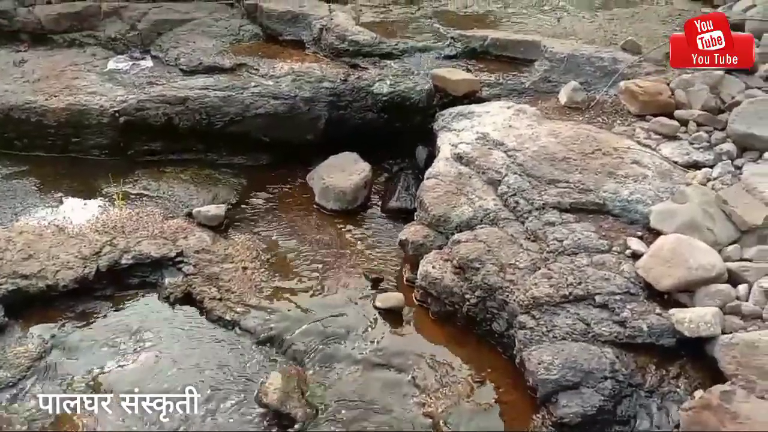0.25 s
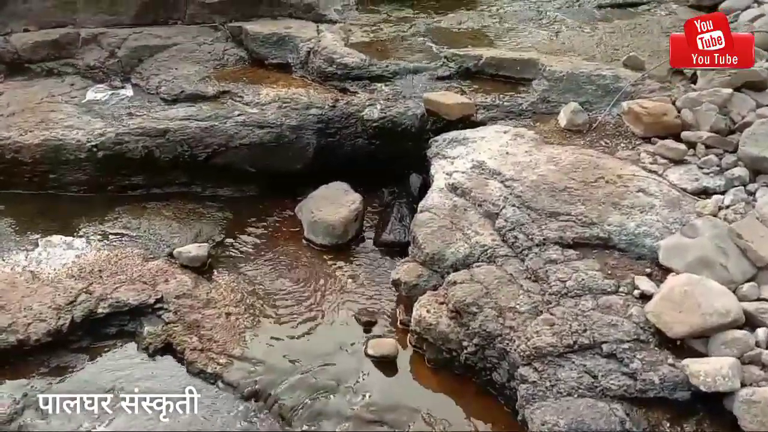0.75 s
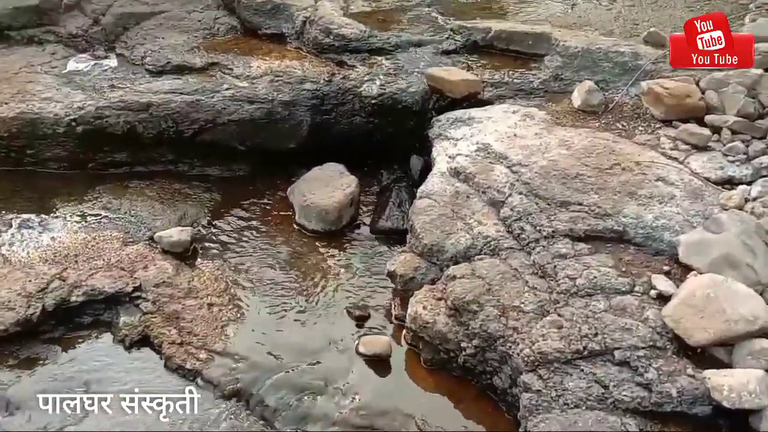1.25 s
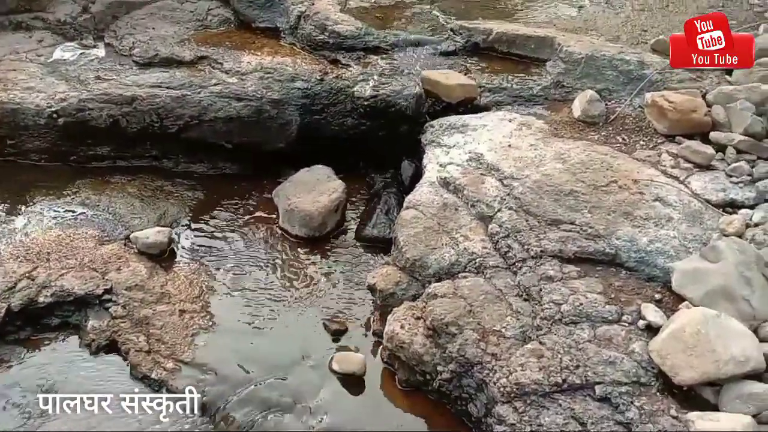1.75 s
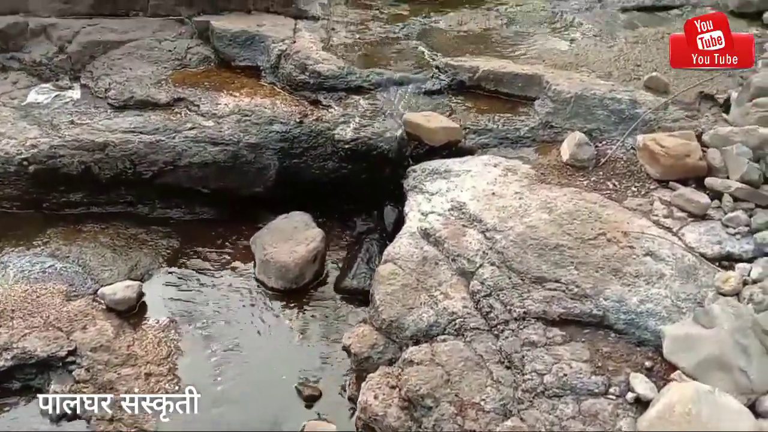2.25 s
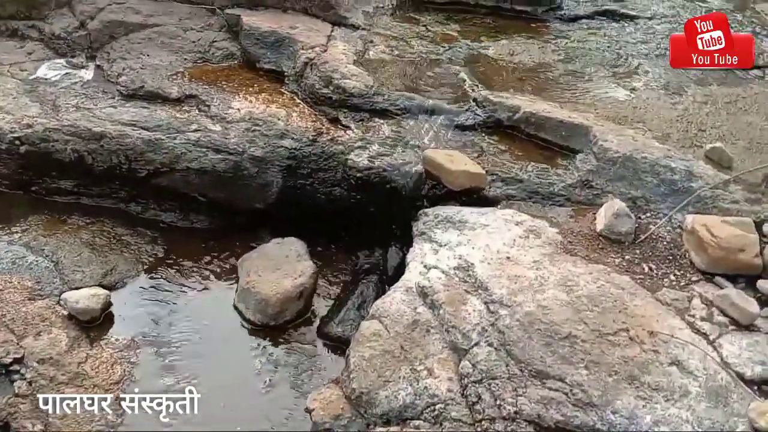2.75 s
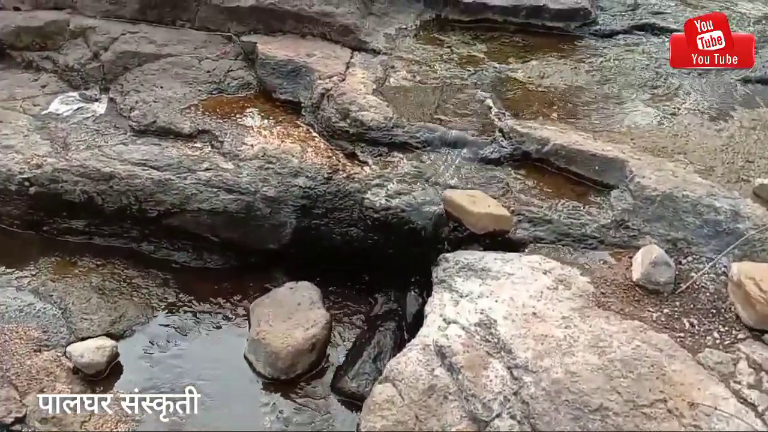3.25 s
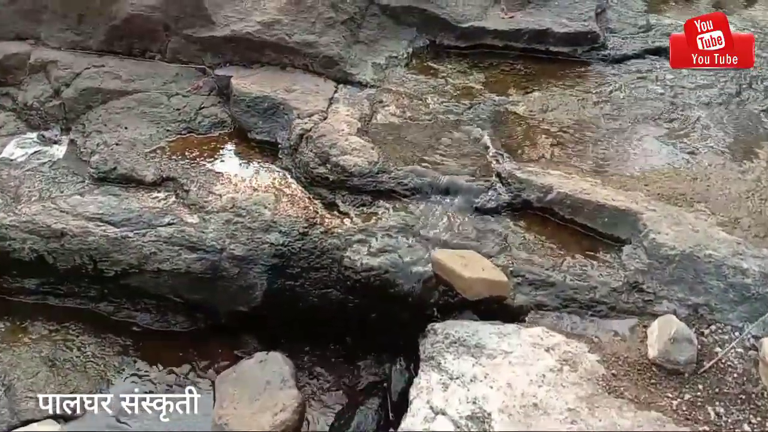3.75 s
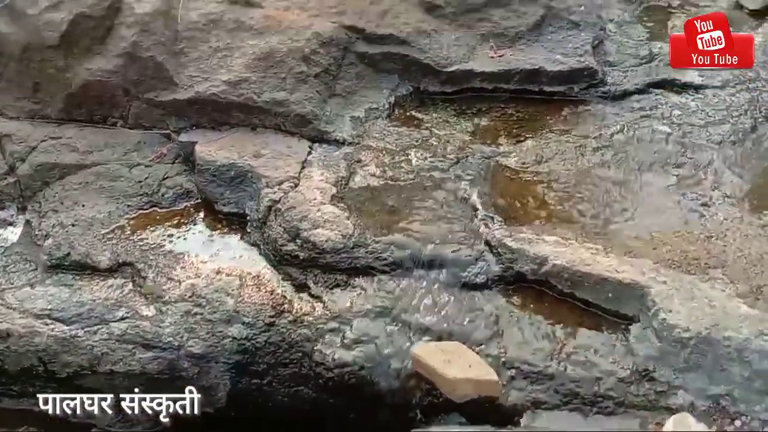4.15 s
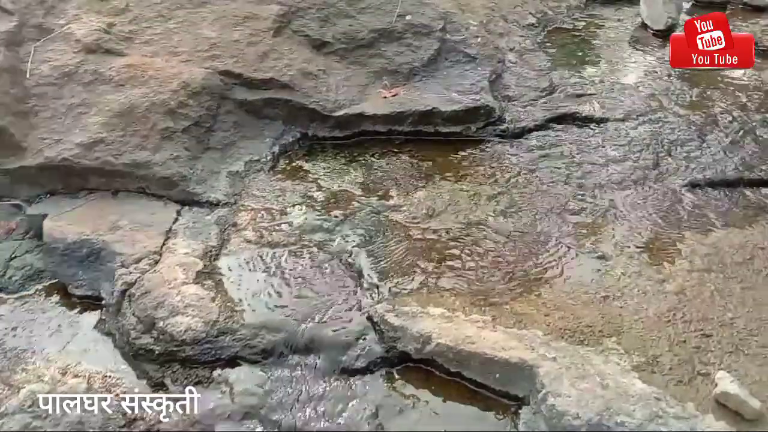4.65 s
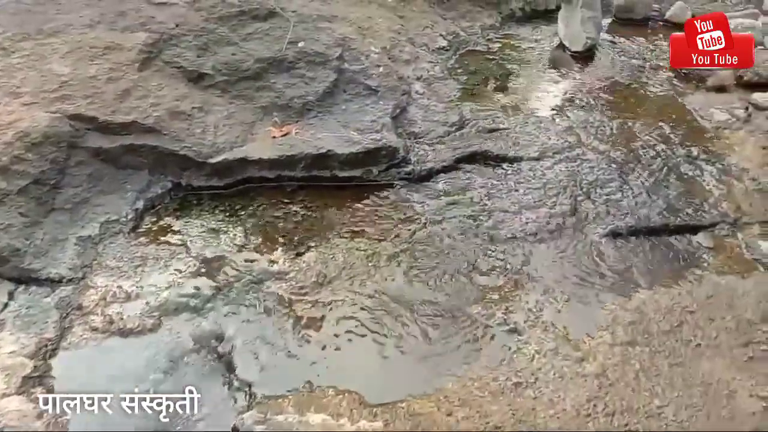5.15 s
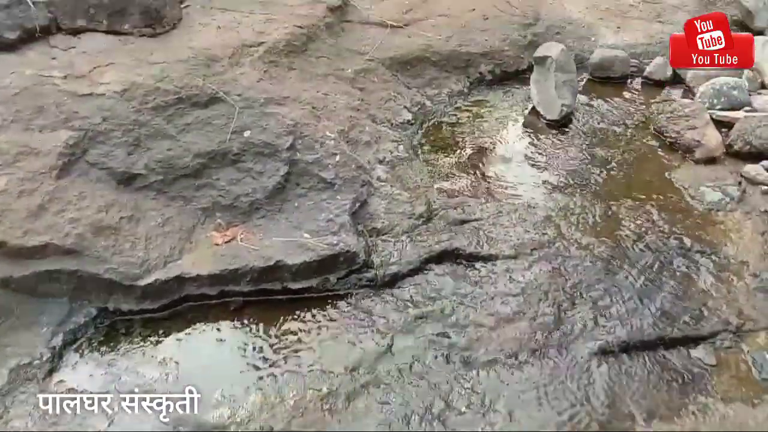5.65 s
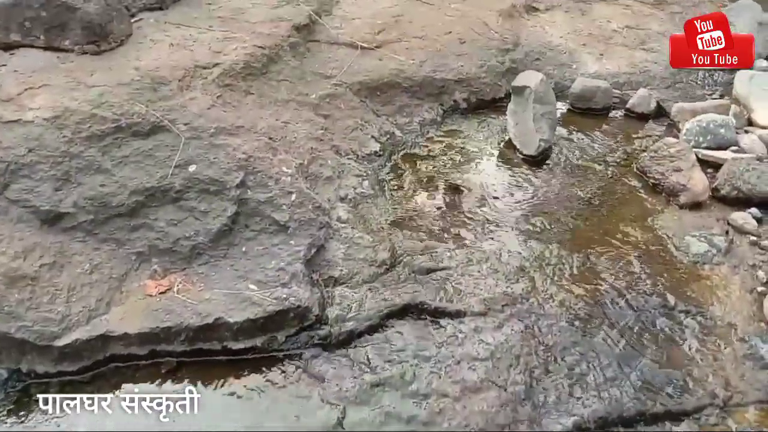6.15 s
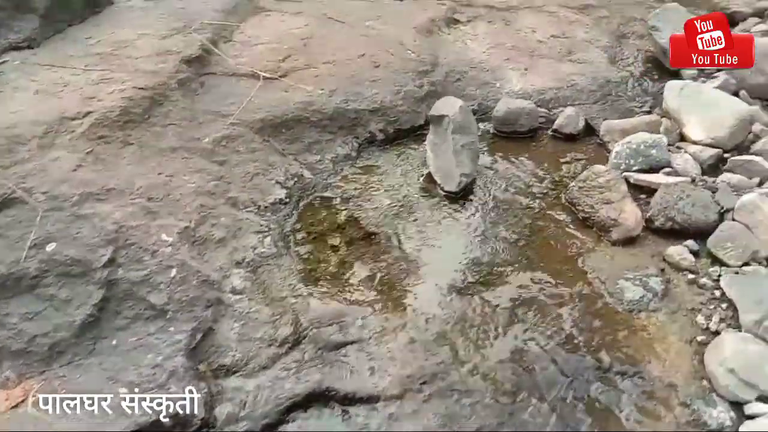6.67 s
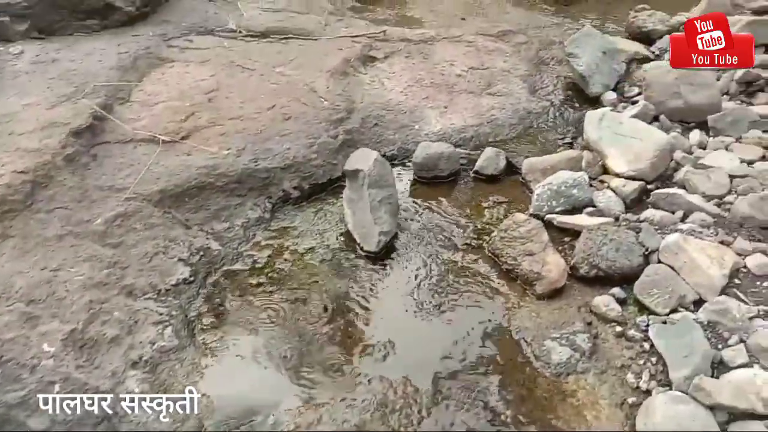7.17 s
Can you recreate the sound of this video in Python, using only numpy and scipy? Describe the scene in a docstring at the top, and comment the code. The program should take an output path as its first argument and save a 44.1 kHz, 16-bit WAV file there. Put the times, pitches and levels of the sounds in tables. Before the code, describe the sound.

A shallow stream trickles and gurgles close by over stones, bright ticks and round plops thinning to faint, sparse drips by the end.

```python
"""A shallow stream trickles between rocks close to the microphone, thinning to faint drips as the level drops.
Air pockets ring as gliding tones: big ones gurgle, small ones tick, and lesser ones cluster around each loud one.
Eddies shed runs of bubbles, a thread of water pours, foam fizzes and wavelets throw spray; the stones scatter
most of these as short echoes. Dull thuds, a distant wash, an electric buzz, a low rumble and a hiss lie underneath."""
import sys
import numpy as np
from scipy import signal
from scipy.fft import rfft, irfft
from scipy.io import wavfile
from scipy.ndimage import uniform_filter1d, map_coordinates

SR = 44100
rng = np.random.default_rng(int(sys.argv[2]) if len(sys.argv) > 2 else 0)


def generate_wav(signal):
    """Clip the signal to [-1, 1] and save it as 16-bit WAV at the path in sys.argv[1]."""
    frames = np.transpose(np.atleast_2d(signal))
    scaled = np.clip(frames, -1, 1) * 32767
    pcm = np.round(scaled).astype(np.int16)
    wavfile.write(sys.argv[1], SR, pcm)


N = 326781
TIME = np.arange(N) / SR  # seconds

# All levels in the tables are in dB before each layer's own trim, filters and echoes.
# Far wash of the stream, which also steers the buzz. Each row: time in seconds, level in dB.
WASH_LEVEL = [(0, -74.5), (1.7, -75), (2.6, -73.5), (3.0, -74), (4.2, -76.5), (5.0, -75.5), (5.5, -76),
              (5.9, -89), (7.41, -87.5)]
# Tone of the far wash. Each row: frequency in Hz, gain in dB.
WASH_COLOUR = [(60, -19.5), (140, 2), (300, 9), (600, 7.5), (1300, -14), (1850, -15), (2500, -11),
               (4600, -11), (6000, -7), (7300, -9), (8300, 13), (9200, -20), (10200, -24.5), (13000, -33)]
# Tone of the electric buzz. Each row: frequency in Hz, gain in dB.
BUZZ_COLOUR = [(60, -16), (120, 2), (240, 1), (300, -2.5), (360, -4), (450, -3), (1000, -43), (7000, -50),
               (10500, -24.5), (13000, -38.5), (15200, -25)]
# Soft bumps of low rumble. Each row: crest in seconds, level in dB.
RUMBLE_BUMPS = [(.08, -68), (.32, -69), (.52, -67), (.72, -68), (.92, -69), (1.35, -74), (1.7, -67.5),
                (1.87, -72), (2.1, -70), (2.3, -73), (2.5, -71), (2.72, -73), (2.92, -74), (3.22, -68),
                (3.45, -74), (3.65, -75), (3.92, -75), (4.1, -65), (4.3, -68), (4.48, -74), (4.73, -74),
                (5.03, -79), (5.22, -77), (5.45, -71), (5.75, -72), (6.8, -87), (7.13, -85), (7.32, -80)]
# Tone of the rumble. Each row: frequency in Hz, gain in dB.
RUMBLE_COLOUR = [(20, -27), (40, -13.5), (60, 5), (90, -2), (130, 1.5), (220, -33.5), (500, -35.5)]
# Tone of the thin hiss. Each row: frequency in Hz, gain in dB.
HISS_COLOUR = [(30, -11.5), (100, 14), (1000, -0.5), (1900, -8), (2500, 13), (3000, 5), (5500, -10),
               (7300, -16), (7750, -5), (8250, 15), (8800, 0), (9600, -12.5), (10500, -6), (13000, -14),
               (15300, -4.5)]
# Dull thuds. Each row: crest in seconds, level in dB, length in seconds.
THUDS = [(2.37, -55, 0.019), (3.213, -47.5, 0.022), (3.467, -50.5, 0.021), (3.64, -64, 0.025),
         (4.09, -67, 0.065), (4.26, -65, 0.047), (4.74, -65, 0.04), (5.46, -78, 0.093), (7.1, -71, 0.038)]
# Tone of the thuds. Each row: frequency in Hz, gain in dB.
THUD_COLOUR = [(30, -20), (90, -6), (220, 7.5), (400, -2.5), (600, -14.5), (1200, 0.5), (2000, -15),
               (4000, -31), (12000, -90)]
# Foam along the edge of the rock. Each row: time in seconds, level in dB.
FOAM_LEVEL = [(0, -61.5), (2.3, -63.5), (2.9, -66.5), (3.4, -65.5), (4.7, -67), (5.4, -71), (6.0, -86),
              (7.41, -86)]
# Thread of water pouring over the ledge. Each row: time in seconds, level in dB.
THREAD_LEVEL = [(0, -53.5), (.9, -58.5), (1.1, -51.5), (1.5, -51), (2.3, -57), (2.7, -61), (2.95, -53),
                (3.2, -59), (3.7, -56), (4.2, -56), (4.6, -64), (5.3, -68), (5.8, -96), (7.41, -96)]
# Pocket the thread falls into. Each row: frequency in Hz, width in Hz before widening, mean level in dB.
POCKET_TONES = [(2127, 100, 7), (3210, 180, -10.5), (3775, 220, 8), (4590, 280, 16), (5330, 400, 0.5),
                (5700, 210, -7)]
# Tone of the snapping films. Each row: frequency in Hz, gain in dB.
FILM_COLOUR = [(400, -2.5), (1200, -13), (1850, -3.5), (2300, -20.5), (4500, -1.5), (6000, -5.5),
               (7350, -2), (8300, 1.5), (9200, -8.5), (10000, -18), (10700, -19), (12500, -26),
               (15000, -26)]
# Steady flow between loud bubbles. Each row: time in seconds, big-bubble level in dB, small-bubble level in dB.
FLOW = [(0, -59, -51), (.3, -61.5, -47.5), (.9, -61.5, -47.5), (1.35, -54.5, -54), (1.6, -60, -45.5),
        (2.2, -53, -48.5), (2.65, -59, -49), (2.9, -58.5, -54.5), (3.15, -53, -51), (3.6, -60, -55.5),
        (4.15, -57.5, -52), (4.7, -62, -56.5), (5.1, -75.5, -57), (5.4, -61, -58), (5.7, -69.5, -62),
        (6.0, -74, -71.5), (6.4, -71.5, -68), (7.41, -81, -69)]
# Lulls as the water draws back between two wavelets. Each row: middle in seconds, change of level in dB.
LULLS = [(.29, -2.5), (1.09, -3), (1.32, -4), (1.819, -3), (2.99, -8), (3.51, -3), (3.682, -3.5),
         (3.95, -3.5), (4.343, -9), (4.91, -0.5), (5.54, -3), (6.08, -1.5), (6.98, -2.5)]
# Tone of the middle-sized bubbles. Each row: frequency in Hz, gain in dB.
BABBLE_COLOUR = [(1300, -1), (1600, -3.5), (1850, -7), (2150, 0), (2600, 2), (2900, -2.5), (3500, 4.5)]
# Hollows between stones that ring with small bubbles and spray. Each row: frequency in Hz, width in Hz, gain in dB.
HOLLOWS = [(2194, 77, -1), (2530, 220, -2.5), (3270, 71, -13.5), (3774, 280, -1.5), (4655, 150, 1.5),
           (4786, 120, -1), (5300, 220, -2.5), (5710, 130, 6.5), (7750, 3000, 10), (10300, 240, 6.5)]
# Tone of the small bubbles. Each row: frequency in Hz, gain in dB.
FIZZ_COLOUR = [(1200, 3.5), (1850, -20), (2150, -5), (2800, -2), (3600, 5), (4600, 4.5), (5100, -2.5),
               (5750, -3.5), (6300, -6.5), (7350, -1), (8300, -5.5), (9200, -3), (10200, -16), (12500, -33)]
# Wider gaps under the ledge that ring with big bubbles. Each row: frequency in Hz, width in Hz, gain in dB.
GAPS = [(538, 240, -3), (730, 160, -9.5), (985, 176, 3), (1368, 34, 5.5), (1730, 140, -11)]
# Tone of the big bubbles. Each row: frequency in Hz, gain in dB.
GURGLE_COLOUR = [(200, -49), (400, -4.5), (600, 0), (850, -2), (1200, 3.5), (1500, 1.5), (1850, -3.5),
                 (2400, -43.5)]
# Wavelets breaking on a stone. Each row: crest in seconds, spray level in dB, length in seconds, droplet pitch in Hz.
SPLASHES = [(0.19, -39, 0.012, 4470), (0.452, -49, 0.0033, 5950), (1.24, -48, 0.0087, 2560),
            (1.346, -43.5, 0.0097, 4900), (1.398, -40, 0.0086, 5300), (1.492, -36, 0.0088, 3860),
            (1.663, -46.5, 0.012, 5200), (1.853, -49, 0.049, 4020), (1.967, -50, 0.022, 4480),
            (2.113, -40.5, 0.024, 4670), (2.427, -45, 0.04, 3920), (2.758, -42.5, 0.032, 4230),
            (3.048, -43, 0.013, 3740), (3.158, -45.5, 0.023, 3820), (3.47, -37, 0.039, 4360),
            (3.789, -43, .012, 2760), (3.89, -53, 0.0097, 4500), (4.014, -54, .003, 4430),
            (4.094, -46.5, 0.059, 4660), (4.451, -54, .01, 3200), (4.668, -53, 0.022, 4400),
            (5.395, -51.5, 0.027, 3800), (5.772, -63, 0.025, 2630), (5.988, -61.5, 0.054, 3200),
            (6.232, -57.5, 0.024, 3900), (6.327, -59.5, 0.042, 3170), (6.75, -53, 0.0057, 3050),
            (6.793, -62.5, 0.029, 3080)]
# Tone of the fine spray. Each row: frequency in Hz, gain in dB.
SPRAY_COLOUR = [(800, -19), (1400, -4.5), (1850, -16), (2400, 2), (3600, 1), (5500, -8), (7300, -13),
                (8500, -9), (10200, -28), (12500, -41)]
# Bubbles shed by one eddy. Each row: start in seconds, length in seconds, first pitch in Hz, last pitch in Hz,
# level in dB.
RUNS = [(0.573, 0.13, 687, 760, -52), (1.16, 0.044, 960, 1170, -54), (2.197, .15, 4800, 4600, -53),
        (2.277, 0.074, 1110, 1080, -52), (2.428, .09, 1310, 1190, -50.5), (2.654, 0.042, 900, 710, -45),
        (3.05, .13, 1150, 1050, -52.5), (3.592, 0.098, 2140, 2340, -63), (3.77, .06, 1890, 1390, -61),
        (3.776, 0.055, 2230, 2120, -62), (4.229, .06, 480, 400, -59), (4.445, 0.033, 1160, 1110, -46.5),
        (4.496, 0.067, 1190, 1017, -51.5), (4.52, 0.065, 820, 660, -54), (4.49, .03, 2080, 2080, -53),
        (4.699, 0.074, 664, 500, -55.5), (4.71, .07, 430, 380, -60), (4.775, 0.039, 1060, 950, -54.5),
        (4.758, 0.067, 2420, 2070, -57.5), (4.81, .07, 1290, 1480, -58), (4.99, .035, 1110, 1200, -56.5),
        (5.051, .075, 1320, 1280, -55), (5.068, 0.052, 2130, 2250, -62), (5.149, 0.029, 877, 920, -52),
        (5.382, 0.093, 5500, 5430, -51.5), (5.723, 0.072, 5750, 5700, -64), (5.764, .04, 1170, 1100, -71),
        (5.961, 0.064, 5000, 5440, -65), (6.283, .06, 760, 700, -66), (6.439, .17, 516, 550, -67.5),
        (6.519, .08, 1380, 1620, -66), (6.543, .04, 664, 630, -66), (6.787, 0.06, 1020, 930, -68),
        (7.137, .04, 900, 870, -70)]
# Bubbles that stand out close by. Each row: start in seconds, pitch in Hz, level in dB, ring time in seconds.
BUBBLES = [(.059, 1290, -50, 0.0042), (.059, 2010, -44, .004), (0.196, 6546, -38, .002),
           (.246, 5500, -38, .0025), (.159, 3940, -36, 0.0026), (0.1635, 3570, -31, 0.0013),
           (0.186, 4660, -30, 0.0021), (0.199, 2190, -37.5, 0.0028), (0.2452, 1330, -40.5, 0.0064),
           (0.32, 5670, -35, 0.003), (0.321, 3575, -34.5, 0.0032), (0.335, 1594, -43.5, 0.017),
           (0.4037, 4250, -30, 0.0012), (0.395, 1288, -43.5, 0.017), (0.415, 1630, -40, 0.0054),
           (0.4393, 6350, -31, 0.0016), (0.4383, 8268, -37.5, 0.0024), (0.488, 1930, -40, 0.0053),
           (0.5401, 1190, -32.5, 0.0064), (0.5401, 670, -39, 0.0069), (0.542, 2130, -29.5, 0.0016),
           (.566, 650, -42, 0.009), (.58, 9000, -38.5, 0.00096), (.594, 705, -45.5, 0.0095),
           (.6335, 762, -33, 0.0094), (.648, 837, -35.5, 0.0041), (0.653, 2150, -35.5, 0.0024),
           (.676, 744, -60, 0.01), (.699, 748, -52, 0.038), (0.7365, 598, -33.5, 0.007),
           (0.7538, 928, -29, 0.0053), (0.7657, 6510, -26, 0.0031), (.767, 5630, -39, 0.0026),
           (0.78, 4370, -33, 0.0061), (0.86, 1040, -48, 0.0061), (0.878, 4480, -32, 0.0014),
           (0.8763, 1236, -26.5, 0.0057), (.922, 790, -40, 0.011), (0.9735, 4060, -28.5, 0.001),
           (.973, 7600, -44, 0.0018), (1.0317, 5300, -27.5, 0.0011), (1.133, 1180, -49, 0.0065),
           (1.146, 5740, -32, 0.0014), (1.164, 808, -44.5, 0.014), (1.167, 2067, -45, 0.0034),
           (1.23, 6700, -43, .002), (1.341, 6840, -40, 0.0021), (1.457, 1750, -40.5, 0.0036),
           (1.489, 2120, -41, 0.0052), (1.645, 6500, -40, .002), (1.1753, 1090, -41.5, 0.005),
           (1.2068, 3200, -21.5, 0.0013), (1.208, 4260, -24, 0.0012), (1.211, 1200, -42, 0.0064),
           (1.294, 4490, -29.5, 0.0032), (1.403, 1534, -44.5, 0.0093), (1.4604, 910, -36, 0.01),
           (1.478, 920, -48, 0.0043), (1.49, 3350, -36, 0.0057), (1.556, 6170, -22, 0.0027),
           (1.5572, 4840, -34, 0.0036), (1.58, 954, -31.5, 0.0097), (1.606, 2330, -41, .0025),
           (1.606, 4430, -33, .002), (1.617, 831, -22, 0.0088), (1.626, 873, -23.5, 0.0059),
           (1.6202, 2500, -34, 0.0022), (1.633, 4300, -33, 0.0016), (1.6553, 920, -26, 0.0065),
           (1.6657, 5850, -25, 0.0014), (1.673, 3440, -36, 0.0014), (1.716, 793, -37, 0.017),
           (1.7786, 5700, -32, 0.0014), (1.832, 4400, -40, 0.0027), (1.85, 4340, -41, 0.0042),
           (1.904, 837, -29, 0.011), (1.9366, 1573, -38.5, 0.0077), (1.9624, 9360, -38, 0.0016),
           (1.9635, 4470, -32, 0.0014), (2.068, 5230, -37.5, 0.0047), (2.094, 3467, -35.5, 0.0035),
           (2.1055, 4880, -30, 0.0012), (2.113, 6160, -36, 0.0022), (2.129, 843, -34, 0.0089),
           (2.1569, 585, -43, 0.0088), (2.158, 934, -41, 0.0063), (2.187, 1510, -42, 0.0089),
           (2.193, 2290, -42.5, 0.0037), (2.212, 4370, -36.5, 0.0035), (2.2184, 784, -38, 0.011),
           (2.2364, 2430, -39, 0.0048), (2.2783, 2520, -36.5, 0.0046), (2.278, 760, -43, 0.006),
           (2.29, 1100, -34.5, 0.012), (2.336, 987, -34, 0.005), (2.337, 4430, -41, 0.002),
           (2.348, 4590, -33.5, 0.0057), (2.3629, 944, -33, 0.004), (2.3656, 2350, -33, 0.0023),
           (2.434, 1443, -40.5, 0.0078), (2.4463, 3800, -28.5, 0.0016), (2.474, 1174, -32, 0.0053),
           (2.52, 4900, -35.5, 0.0049), (2.5529, 3140, -30.5, 0.0015), (2.57, 2610, -35.5, 0.0027),
           (2.572, 3250, -37, 0.0021), (2.579, 5800, -37.5, 0.002), (2.59, 1210, -46.5, 0.011),
           (2.675, 1006, -28.5, 0.0046), (2.704, 3880, -34, 0.0047), (2.727, 2113, -39.5, 0.011),
           (2.737, 624, -44.5, 0.0075), (2.758, 1585, -41.5, 0.0073), (2.78, 3710, -34, 0.0037),
           (2.897, 1052, -44, 0.0081), (2.92, 1727, -43, 0.0078), (2.9265, 1160, -36, 0.0083),
           (2.949, 1180, -46, 0.0061), (2.976, 1036, -46, 0.0087), (3.062, 1114, -40, 0.0099),
           (3.118, 1055, -35.5, 0.0073), (3.132, 1090, -35.5, 0.006), (3.162, 5550, -37.5, 0.0022),
           (3.179, 1140, -43, 0.0057), (3.189, 1730, -39, 0.0045), (3.192, 3470, -35, 0.0012),
           (3.193, 1034, -40.5, .006), (3.2124, 533, -37, 0.0032), (3.23, 2660, -41, .003),
           (3.2622, 1020, -31.5, 0.0074), (3.277, 826, -33.5, 0.0028), (3.3195, 5530, -38, 0.005),
           (3.371, 2850, -26, 0.0028), (3.388, 3540, -38, 0.0057), (3.42, 2980, -38, 0.0032),
           (3.466, 5280, -31.5, .0013), (3.542, 5320, -35.5, 0.0034), (3.5567, 3500, -27.5, 0.002),
           (3.5922, 1000, -39, 0.0061), (3.649, 1310, -33, 0.0012), (3.649, 5300, -33, 0.001),
           (3.714, 740, -40.5, 0.018), (3.726, 1024, -25.5, 0.0046), (3.739, 4000, -29.5, 0.0014),
           (3.791, 4360, -44, 0.0026), (3.948, 4430, -35, 0.0033), (4, 4470, -38, .002),
           (4.018, 4060, -29, 0.0015), (4.026, 1330, -43, 0.0031), (4.0398, 1724, -39.5, 0.0088),
           (4.053, 4430, -31.5, 0.0024), (4.058, 1420, -47, 0.0076), (4.085, 4320, -23.5, 0.0012),
           (4.085, 5500, -28, 0.0015), (4.084, 7100, -31, 0.0029), (4.163, 4600, -40, 0.002),
           (4.2316, 750, -39.5, 0.007), (4.236, 1360, -42.5, 0.0063), (4.238, 5320, -37.5, 0.0021),
           (4.2475, 710, -31.5, 0.0037), (4.251, 3410, -31.5, 0.0035), (4.266, 816, -44, 0.012),
           (4.276, 475, -45.5, 0.0068), (4.285, 1107, -44.5, 0.0083), (4.368, 4920, -43, .0025),
           (4.3735, 4980, -32.5, 0.0018), (4.4435, 1140, -31.5, 0.0041), (4.278, 2200, -44, .004),
           (4.444, 4800, -29.5, 0.0011), (4.4514, 3359, -34, 0.0029), (4.525, 4760, -28, 0.0019),
           (4.543, 1028, -44, 0.015), (4.566, 1550, -51, .005), (4.581, 2250, -41.5, 0.0041),
           (4.586, 3230, -43, .004), (4.62, 2300, -45.5, 0.0037), (4.65, 4240, -38.5, 0.0026),
           (4.698, 5120, -38, 0.0032), (4.704, 1273, -35.5, 0.0025), (4.733, 527, -40, 0.0047),
           (4.733, 1400, -43.5, 0.0055), (4.776, 1017, -38.5, 0.0033), (4.806, 5580, -39, 0.0028),
           (4.841, 6900, -38.5, 0.0029), (4.851, 1433, -42.5, 0.008), (4.94, 1086, -46, 0.0075),
           (4.896, 5580, -44, 0.0022), (4.967, 2200, -49.5, 0.0032), (4.969, 1510, -53, .008),
           (5.061, 1273, -40.5, 0.0052), (5.063, 2060, -42.5, 0.0065), (5.0974, 1180, -39.5, 0.003),
           (5.097, 3520, -38, 0.0013), (5.111, 2190, -39.5, 0.003), (5.109, 1440, -45, 0.0031),
           (5.1463, 874, -43.5, 0.0098), (5.1629, 2390, -32, 0.0045), (5.168, 990, -51, 0.0052),
           (5.225, 4370, -34, 0.00077), (5.2297, 4400, -35.5, 0.0016), (5.276, 3850, -41.5, 0.0039),
           (5.3303, 2550, -41.5, 0.0014), (5.425, 2890, -35, 0.0034), (5.424, 3830, -39.5, 0.0038),
           (5.45, 2580, -28, 0.0029), (5.45, 4680, -35, 0.0015), (5.466, 2980, -38, 0.0022),
           (5.475, 4100, -39.5, 0.0098), (5.499, 1420, -45, 0.0033), (5.547, 1440, -47, 0.0059),
           (5.5856, 2730, -39, 0.0023), (5.6025, 560, -52.5, 0.012), (5.68, 2450, -36, 0.0035),
           (5.681, 555, -53, 0.014), (5.714, 2520, -48, 0.004), (5.779, 1160, -54.5, 0.007),
           (5.871, 2400, -56, 0.0035), (5.923, 2460, -53, .003), (5.969, 2860, -49, .002),
           (5.9798, 2430, -43, 0.0021), (5.9887, 5180, -49, 0.0027), (6.15, 562, -58.5, 0.022),
           (6.213, 4020, -46, 0.0015), (6.233, 1370, -49.5, 0.0025), (6.275, 3730, -48, 0.0013),
           (6.2764, 740, -54.5, 0.019), (6.358, 7600, -50, 0.0008), (6.359, 3080, -44, 0.002),
           (6.3726, 1460, -47, 0.0072), (6.417, 5650, -55, .003), (6.445, 3980, -49.5, 0.0034),
           (6.522, 1400, -50.5, 0.0036), (6.564, 1500, -48.5, 0.003), (6.596, 1670, -50.5, 0.0043),
           (6.649, 2640, -55, 0.0029), (6.743, 1374, -56, 0.0059), (6.745, 544, -59, 0.0066),
           (6.7567, 3740, -52, 0.0034), (6.827, 969, -61, 0.0066), (6.913, 2620, -40, 0.0056),
           (6.933, 790, -59, 0.0059), (6.92, 1378, -60, .006), (7.001, 4850, -55, 0.0027),
           (7.029, 2000, -51.5, 0.0063), (7.032, 2820, -52.5, .004), (7.086, 3650, -54, 0.002),
           (7.2, 1400, -60, 0.0064), (7.1292, 910, -46, 0.0061), (7.2926, 1456, -54.5, 0.01),
           (7.34, 2670, -56.5, 0.0022), (7.394, 1026, -61, 0.012)]
# Bare rock around the listener dulls two ranges. Each row: frequency in Hz, gain in dB.
ROCK_COLOUR = [(1550, 0), (1830, -2), (2050, -0.5), (6700, 0), (7300, -7.5), (7900, 0)]

TOP_HZ = 15600  # upper limit of the recorder
BUZZ_HZ = 60.1
RUMBLE_S, RUMBLE_FLOOR_DB = 0.079, -90  # length of a bump; rumble between bumps
FOAM_HZ, FOAM_WIDTH_HZ = 5460, 720  # width of each of two filter passes
POCKET_SWAY_S = 0.0028  # typical shift in time that bends the pocket's tones
LULL_HALF_S = 0.1  # from the edge of a lull to its middle
RIPPLE_PER_S, RIPPLE_DB = 11, -0.18  # small ripples move all the bubbling together
BABBLE_DB = -10  # middle-sized bubbles against the small-bubble flow
BIG_BELOW_HZ, FINE_ABOVE_HZ = 1850, 3000  # pitch limits of the big and the fine loud bubbles
SPRAY_WIDTH = 0.63  # bandwidth of the spray as a share of the droplet pitch
DROP_SPREAD_OCTAVES, DROP_CYCLES = 0.95, 10  # pitch range within a splash; ring time in cycles
RUN_PER_S, RUN_SPREAD_OCTAVES, RUN_CYCLES = 170, 0.2, 8.89  # bubbles a second; pitch range; ring in cycles
MATE_SPREAD_OCTAVES, MATE_DB = 0.461, -19  # pitch range around the loud bubble; mean level against it
MATE_LEAD_S, MATE_SPAN_S = 0.0095, 0.04  # start of the group ahead of the loud bubble; span of its onsets


def undb(db):
    """Decibels to gain."""
    return 10 ** (np.asarray(db) / 20)


def unit(x):
    """Scale to rms 1."""
    return x / np.sqrt(np.mean(x ** 2))


def curve(table, axis=1):
    """One column of a table, joined by straight lines in time."""
    rows = np.array(table)
    return np.interp(TIME, rows[:, 0], rows[:, axis])


def colour(x, points):
    """Minimum-phase filter through (Hz, dB) points: clicks keep their sharp front."""
    size = 4096
    hz, db = np.transpose(points)
    grid = np.maximum(np.fft.rfftfreq(size, 1 / SR), 1)
    gain_db = np.interp(np.log(grid), np.log(hz), db)
    cepstrum = irfft(np.log(undb(gain_db)))
    # folding the cepstrum forward makes the filter causal
    cepstrum[1:size // 2] *= 2
    cepstrum[size // 2 + 1:] = 0
    impulse = irfft(np.exp(rfft(cepstrum)))
    return signal.fftconvolve(x, impulse)[:N]


def noise(points):
    """Coloured noise of rms 1."""
    return unit(colour(rng.standard_normal(N), points))


def add(track, seconds, sound):
    """Mix a sound into a track."""
    start = int(np.clip(seconds * SR, 0, N - 1))
    track[start:start + len(sound)] += sound[:N - start]


def swells(table):
    """Gain of rounded swells, from rows of (s, dB, length s)."""
    power = np.zeros(N)
    for s, db, length in table:
        age = np.arange(-1.5 * length, 1.5 * length, 1 / SR)
        add(power, s + age[0], undb(db) ** 2 * np.exp(-(2 * age / length) ** 2))
    return np.sqrt(power)


def walk(rate):
    """Random levels held 1 / rate s and slewed twice, scaled to rms 1."""
    hold = int(SR / rate)
    steps = np.repeat(rng.standard_normal(N // hold + 1), hold)
    slewed = uniform_filter1d(uniform_filter1d(steps, hold), hold)
    return unit(slewed[:N])


def clicks(rate, spread_db):
    """Random impulses of either sign, rms 1: most are small, a few stand out."""
    strength = np.minimum(rng.exponential(size=N), 3.5)
    present = rng.random(N) < rate / SR
    return unit(present * rng.choice([-1, 1], N) * undb(spread_db * strength))


def resonate(x, modes, direct_db):
    """The direct sound plus the ringing of a few (Hz, width Hz, dB) cavities."""
    out = undb(direct_db) * x
    for hz, width, db in modes:
        out = out + undb(db) * signal.lfilter(*signal.iirpeak(hz, hz / width, fs=SR), x)
    return out


def twice(band, x):
    """Pass through the same resonance twice, for steeper sides."""
    return signal.lfilter(*band, signal.lfilter(*band, x))


def ledge(x, lag_s=0.003, echo_db=-8):
    """The rock wall opposite sends one delayed copy back, which combs the colour."""
    return x + undb(echo_db) * np.interp(TIME - lag_s, TIME, x, left=0)


def stones(spots, echo_db, t60):
    """Each spot of the stream has its own spray of short echoes from the stones around it."""
    t = TIME[:SR // 8]
    out = spots.sum(axis=0)
    for spot in spots:
        # cubed noise leaves a few strong echoes among many weak ones
        echoes = rng.standard_normal(len(t)) ** 3 * undb(-60 * t / t60) * (t > .002)
        echoes = echoes / np.linalg.norm(echoes)
        out = out + undb(echo_db) * signal.oaconvolve(spot, echoes)[:N]
    return out


def bubble(hz, ring, glide, neck=0.6, fade=0.66, roundness=1.24):
    """An air pocket pinches off, swells, rings and dies; its pitch climbs as it nears the surface."""
    age = np.arange(int(4 * ring * SR) + 2) / (ring * SR)  # in ring times
    attack = np.sin(np.pi / 2 * np.minimum(age / neck, 1)) ** 2
    decay = np.exp(-(np.maximum(age - neck, 0) / fade) ** roundness)
    pitch = hz * (1 + glide * np.tanh((age - neck) / 2))
    return attack * decay * np.sin(2 * np.pi * np.cumsum(pitch) / SR)


def swarm(rate, low_hz, high_hz, cycles, spread_db, glide, count=4):
    """Many bubbles of random size, dealt over a few spots: most are faint, a few are strong."""
    spots = np.zeros((count, N))
    chances = rng.random((int(rate * N / SR), 5))
    for k, (when, size, strength, damping, rise) in enumerate(chances):
        hz = low_hz * (high_hz / low_hz) ** size
        db = -spread_db * np.log(1 - .95 * strength)
        ring = cycles * 2 ** (2 * damping - 1) / hz
        gain = undb(db) * np.sqrt(hz / low_hz)
        add(spots[k % count], when * N / SR, gain * bubble(hz, ring, glide * rise))
    return spots


def clusters(big, lead_s, settle_s, follow):
    """Gain of the churn around each loud big or fine bubble: it builds before, settles after, follows its level."""
    power = np.zeros(N)
    age = TIME[:SR // 2] - .1
    shape = np.exp(np.minimum(age / lead_s, -age / settle_s))
    for s, hz, db, ring in BUBBLES:
        chosen = hz < BIG_BELOW_HZ if big else hz > FINE_ABOVE_HZ
        if chosen:
            add(power, s + age[0], (undb(follow * db) * shape) ** 2)
    return np.sqrt(power)


def lapping():
    """Gain of the bubbling: it flickers with the ripples and sinks in each lull."""
    lull_db = np.zeros(N)
    age = np.arange(-LULL_HALF_S, LULL_HALF_S, 1 / SR)
    for s, db in LULLS:
        add(lull_db, s - LULL_HALF_S, db * np.cos(np.pi / 2 * age / LULL_HALF_S) ** 2)
    return undb(lull_db + RIPPLE_DB * walk(rate=RIPPLE_PER_S))


def wash(level_db):
    """The stream further off: its many small sounds merge into coloured, slightly wavering noise."""
    return noise(WASH_COLOUR) * undb(level_db + 1.0 + 1.0 * walk(rate=18))


def buzz(level_db):
    """One sharp spike a cycle, coloured into a hum with a thin edge; it part-follows the wash level."""
    cycle = (BUZZ_HZ * TIME) % 1 - .5
    spikes = np.sinc(cycle * SR / BUZZ_HZ)
    hum = unit(colour(spikes - spikes.mean(), BUZZ_COLOUR))
    return hum * undb(-70.0 + 0.69 * (level_db + 73.0) + 0.9 * walk(rate=14))


def rumble():
    """Low noise swells in soft bumps over a steady floor."""
    bumps = swells([(s, db, RUMBLE_S) for s, db in RUMBLE_BUMPS])
    return noise(RUMBLE_COLOUR) * np.hypot(bumps, undb(RUMBLE_FLOOR_DB))


def background():
    """Distant wash and buzz dip in the lulls; they and the rumble sink near the end, over a constant thin hiss."""
    level_db = curve(WASH_LEVEL)
    dips = lapping() ** 0.5  # half the depth in dB
    hiss = noise(HISS_COLOUR) * undb(-78.5)
    return dips * (wash(level_db) + buzz(level_db)) + rumble() + hiss


def thuds():
    """Dull thuds: rounded swells of mostly low noise."""
    return noise(THUD_COLOUR) * swells(THUDS)


def foam():
    """Tiny bubbles of about one size burst densely, in quick uneven flurries: a bright sizzle."""
    bursts = clicks(rate=2500, spread_db=5)
    band = signal.iirpeak(FOAM_HZ, FOAM_HZ / FOAM_WIDTH_HZ, fs=SR)
    return unit(twice(band, bursts)) * undb(curve(FOAM_LEVEL) + 3.8 * walk(rate=70))


def films():
    """Thin films snap on the foam below the thread, a fine crackle."""
    snaps = clicks(rate=700, spread_db=6)
    sizzle = stones(snaps[None], echo_db=-8, t60=0.008)
    return unit(colour(sizzle, FILM_COLOUR)) * undb(curve(THREAD_LEVEL) - 10)


def thread():
    """Drops keep a small pocket ringing as it fills and drains; each tone swells, sinks and bends alone."""
    drops = clicks(rate=3600, spread_db=9)
    tones = 0
    for hz, width, db in POCKET_TONES:
        band = signal.iirpeak(hz, hz / width / 1.2, fs=SR)
        tone = twice(band, drops)
        swayed_time = TIME + POCKET_SWAY_S * walk(rate=7)
        bent = map_coordinates(tone, [swayed_time * SR], mode="mirror")
        tones = tones + bent * undb(db + 9.2 * walk(rate=14))
    return unit(tones) * undb(curve(THREAD_LEVEL) - 3.5)


def babble():
    """Weak middle-sized bubbles overlap in a chatter of short notes between the plops."""
    notes = swarm(rate=220, low_hz=1300, high_hz=3600, cycles=14, spread_db=4.5, glide=0.05)
    return unit(colour(notes.sum(axis=0), BABBLE_COLOUR)) * undb(curve(FLOW, axis=2) + BABBLE_DB)


def fizz():
    """Small bubbles tick in the riffles, over a patter of bursting films; the hollows ring with both."""
    ticks = swarm(rate=1150, low_hz=1880, high_hz=6400, cycles=13, spread_db=5, glide=0.012)
    patter = swarm(rate=1400, low_hz=1770, high_hz=10800, cycles=6, spread_db=8.5, glide=0.06)
    water = stones(unit(ticks) + undb(-6) * unit(patter), echo_db=-6, t60=0.05)
    ringing = resonate(ledge(water), HOLLOWS, direct_db=-11.0)
    steady = undb(curve(FLOW, axis=2) - 5.0)
    churn = undb(-24.5) * clusters(big=False, lead_s=0.0019, settle_s=0.012, follow=0.72)
    return unit(colour(ringing, FIZZ_COLOUR)) * np.hypot(steady, churn)


def gurgle():
    """Big bubbles where water folds over the rocks ring the gaps under the ledge and surge around loud plops."""
    pockets = swarm(rate=300, low_hz=490, high_hz=1750, cycles=9, spread_db=4, glide=0.06)
    bubbles = stones(pockets, echo_db=-5, t60=0.081)
    ringing = resonate(bubbles, GAPS, direct_db=5.5)
    steady = undb(curve(FLOW, axis=1) - 2.5)
    churn = undb(-31.0) * clusters(big=True, lead_s=0.0097, settle_s=0.043, follow=0.8)
    return unit(colour(ringing, GURGLE_COLOUR)) * np.hypot(steady, churn)


def spray():
    """Fine spray of each wavelet: dense clicks, banded around the pitch of its droplets."""
    mist = colour(resonate(clicks(rate=2600, spread_db=5.5), HOLLOWS, direct_db=9), SPRAY_COLOUR)
    out = np.zeros(N)
    for s, db, length, hz in SPLASHES:
        banded = resonate(mist, [(hz, SPRAY_WIDTH * hz, 0)], direct_db=-10.5)
        out += unit(banded) * swells([(s, db, length)])
    return out


def droplets(count=14):
    """The separate droplets of each splash ring as bubbles scattered over its length; they share its energy."""
    out = np.zeros(N)
    chances = rng.random((len(SPLASHES), count, 3))
    for (s, db, length, hz), drops in zip(SPLASHES, chances):
        for k, (when, size, strength) in enumerate(drops):
            pitch = hz * 2 ** (DROP_SPREAD_OCTAVES * (size - .5))
            ring = DROP_CYCLES / pitch
            gain = undb(db + 10 * (strength - 1.0)) * np.sqrt(2 * length / (count * ring))
            start = s - ring + 1.3 * length * ((k + when) / count - .5)
            add(out, start, gain * bubble(pitch, ring, 0.057))
    return stones(out[None], echo_db=0.5, t60=0.037)


def splashes():
    """A breaking wavelet throws droplets of similar size in a mist of finer spray."""
    return undb(-2.5) * droplets() + undb(-9) * spray()


def runs():
    """An eddy sheds overlapping bubbles in quick succession; their pitch slides as it grows or shrinks."""
    out = np.zeros(N)
    chances = rng.random((len(RUNS), 64, 3))
    for (s, length, first_hz, last_hz, db), chance in zip(RUNS, chances):
        count = int(np.clip(length * RUN_PER_S, 2, len(chance)))
        for k, (when, size, strength) in enumerate(chance[:count]):
            share = (k + when) / count  # progress through the run
            centre_hz = first_hz + share * (last_hz - first_hz)
            pitch = centre_hz * 2 ** (RUN_SPREAD_OCTAVES * (size - .5))
            ring = RUN_CYCLES / pitch
            gain = undb(db + 5.6 * (strength - 1.0)) * np.sqrt(2 * length / (count * ring))
            add(out, s + share * length - ring / 2, gain * bubble(pitch, ring, 0.04, neck=0.86))
    return stones(out[None], echo_db=-10.5, t60=0.07)


def mates(count=5):
    """Lesser bubbles of nearly the same size cluster around each loud one."""
    out = np.zeros(N)
    chances = rng.random((len(BUBBLES), count, 3))
    for (s, hz, db, ring), group in zip(BUBBLES, chances):
        for k, (when, size, strength) in enumerate(group):
            pitch = hz * 2 ** (MATE_SPREAD_OCTAVES * (size - .5))
            # weaker still around a loud bubble that rings only briefly
            brevity = np.sqrt(min(ring * pitch / RUN_CYCLES, 1))
            gain = undb(db + MATE_DB + 6.5 * (strength - .5)) * brevity
            start = s - MATE_LEAD_S + MATE_SPAN_S * (k + when) / count
            add(out, start, gain * bubble(pitch, RUN_CYCLES / pitch, 0.078, neck=0.9))
    return out


def near_bubbles(count=6):
    """The loud plops and ticks; each sheds a weaker daughter bubble, and big ones linger among the stones."""
    big, small = np.zeros((2, count, N))
    chances = rng.random((len(BUBBLES), 3))
    for k, ((s, hz, db, ring), (rise, lag, size)) in enumerate(zip(BUBBLES, chances)):
        spot = (big if hz < BIG_BELOW_HZ else small)[k % count]
        add(spot, s, undb(db) * bubble(hz, ring, 0.048 * rise))
        daughter = bubble(hz * (.85 + 0.3 * size), ring, 0.08 * rise)
        add(spot, s + ring * (1.1 + 2 * lag), undb(db - 13.5) * daughter)
    return stones(big, echo_db=-7.0, t60=0.095) + stones(small, echo_db=-7.0, t60=0.058)


def scene():
    """The stream among bare rock and its background, in one channel."""
    bubbling = lapping() * (foam() + films() + thread() + babble() + fizz() + gurgle())
    water = thuds() + bubbling + splashes() + runs() + mates() + near_bubbles()
    return (background() + colour(water, ROCK_COLOUR))[None]


def record(dry):
    """The recorder cuts the top with a steep low-pass."""
    low_pass = signal.ellip(8, .2, 70, TOP_HZ, fs=SR, output="sos")
    return signal.sosfilt(low_pass, dry)


dry = scene()
out = record(dry)
generate_wav(out)
```